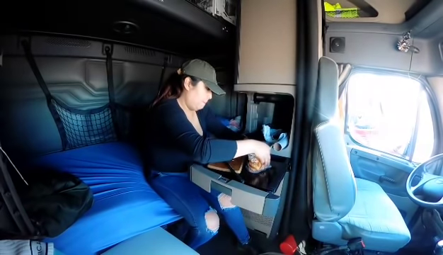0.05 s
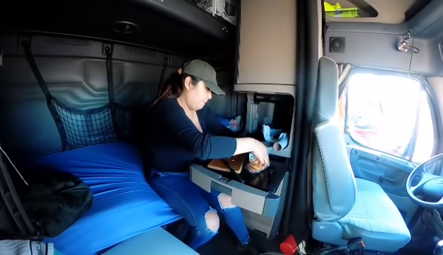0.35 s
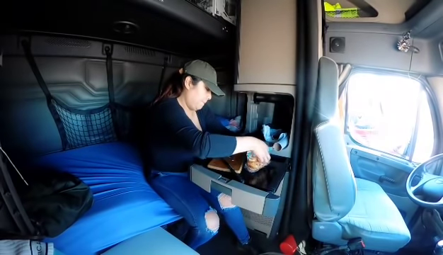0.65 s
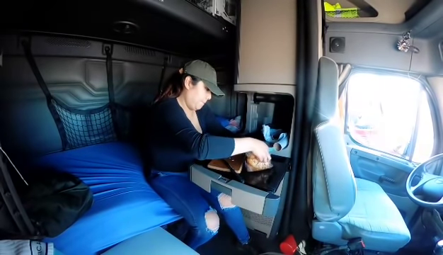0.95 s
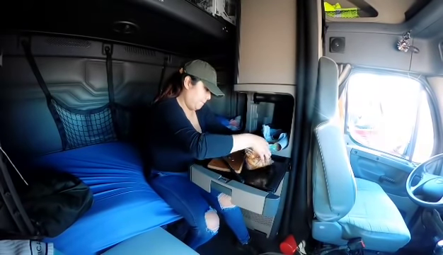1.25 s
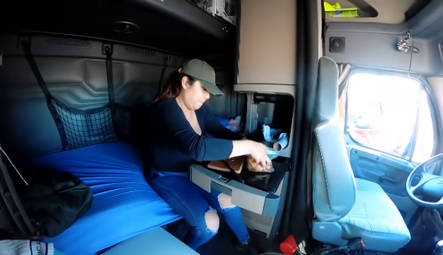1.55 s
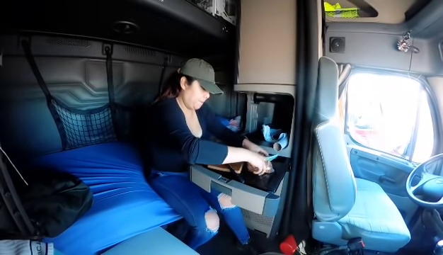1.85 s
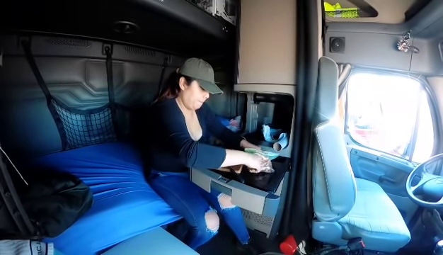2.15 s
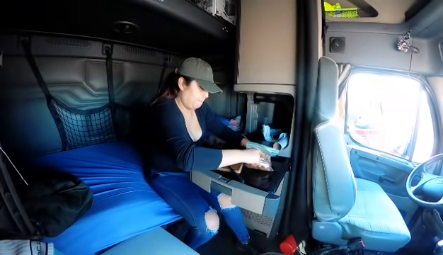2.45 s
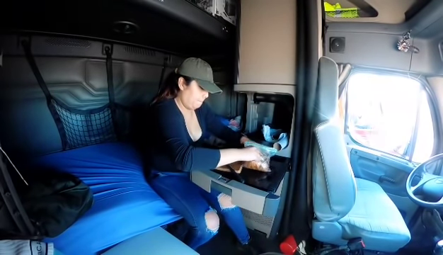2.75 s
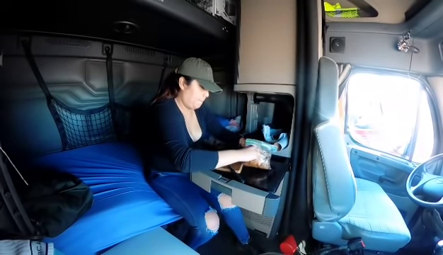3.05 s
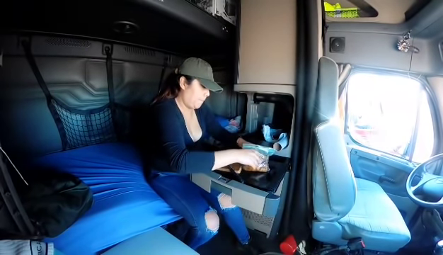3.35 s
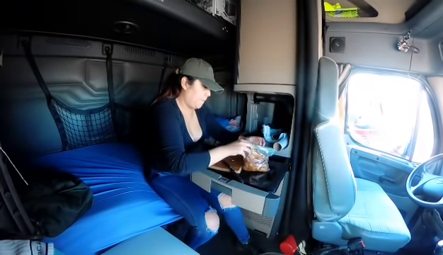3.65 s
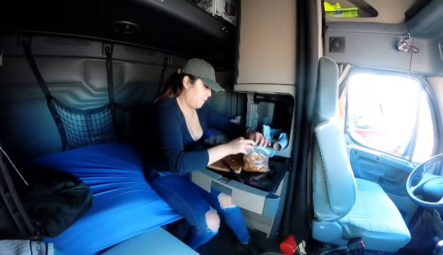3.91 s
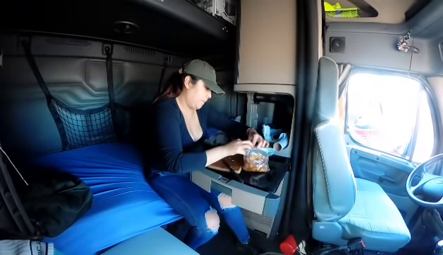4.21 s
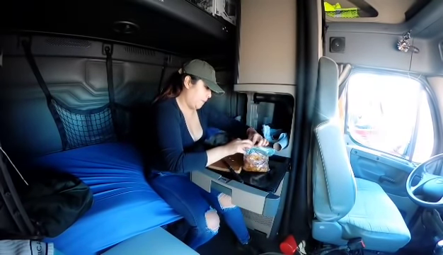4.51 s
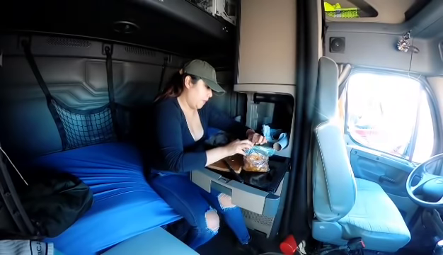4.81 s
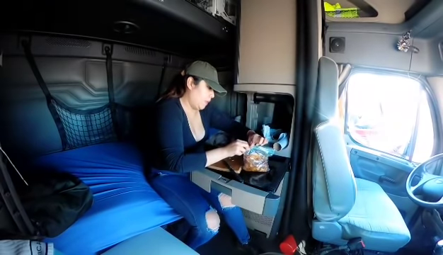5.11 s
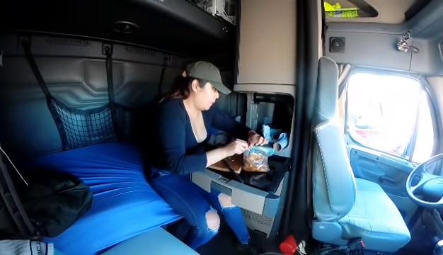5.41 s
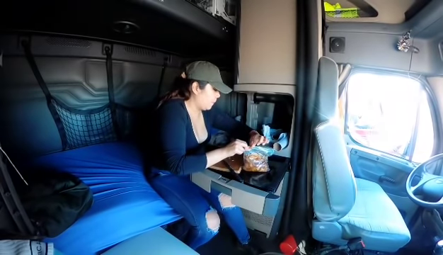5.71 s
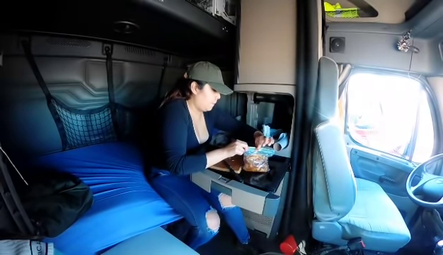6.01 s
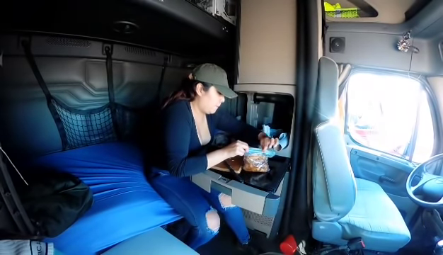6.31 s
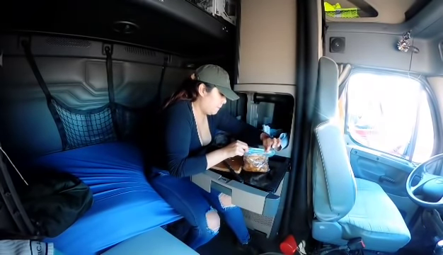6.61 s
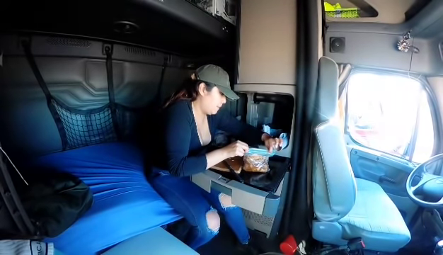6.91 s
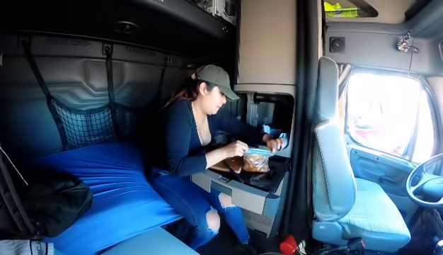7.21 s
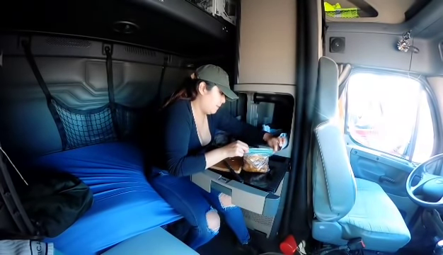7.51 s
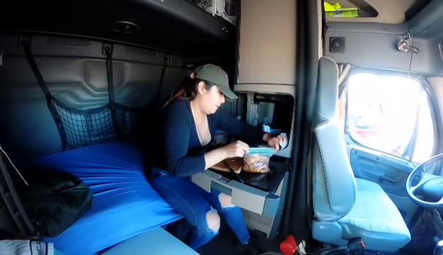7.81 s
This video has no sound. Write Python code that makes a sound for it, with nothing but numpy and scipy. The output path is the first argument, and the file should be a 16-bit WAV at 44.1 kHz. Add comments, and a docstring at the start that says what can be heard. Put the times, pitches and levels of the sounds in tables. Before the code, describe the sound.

A large diesel truck engine idles steadily, heard from inside its sleeper cab as a deep rumble and hum with a muffled knock. Close by, a plastic zip bag is squeezed and rummaged through, crinkling and snapping, with a few light taps of food pieces. About halfway through, the handling settles into occasional ticks and crackles while the engine idles on unchanged.

```python
"""From the start, a six-cylinder diesel truck engine idles at 650 rpm, heard inside its sleeper cab.
Its firings make the cab boom, with rumble, air noise, hum, muffled knock and ringing injectors.
Right away, someone squeezes and rummages in a plastic zip bag: creases in the film crinkle and snap,
and pieces of food tap together. After four seconds the hands come to rest and just hold the bag,
so it only ticks now and then while the engine idles on."""
import sys
import numpy as np
from scipy import signal
from scipy.fft import rfft, irfft, next_fast_len
from scipy.io import wavfile
from scipy.ndimage import uniform_filter1d

SR = 44100
rng = np.random.default_rng(int(sys.argv[2]) if len(sys.argv) > 2 else 0)


def transcribe(u):
    """Save the signal u as a 16-bit wav file named by the first command-line argument.

    u: samples, shape (n,) or (channels, n), limited to [-1, 1]; the rate is SR.
    q: integer samples, one column per channel.
    """
    v = np.clip(np.atleast_2d(u).T, -1, 1)
    q = np.round(v * 32767).astype(np.int16)
    wavfile.write(sys.argv[1], SR, q)


N = 346386
TIME = np.arange(N) / SR
CYCLE_HZ, CYLINDERS = 5.41496, 6  # in one cycle the engine turns twice and each cylinder fires once

# A spectrum table only sets the balance of low and high pitches, not the overall loudness.
# exhaust and fan rumble: pitch_hz, level_db
RUMBLE_SPECTRUM = [(8, -6), (22, 1.5), (48, 3), (90, 2), (135, -1), (180, -5.5), (240, -10), (305, -8),
                   (348, -13), (378, -7.5), (405, -16), (440, -17.5), (520, -25.5), (2500, -85.5)]
# steady air noise: pitch_hz, level_db
AIR_SPECTRUM = [(500, -19.5), (1500, 6.5), (2600, -1.5), (3600, 1.5), (4200, -7.5), (5600, -8), (6200, -15),
                (7900, -18), (8300, -25.5), (10500, -32.5), (11500, -43)]
# tones of the booming cab: multiple_of_cycle_rate, level_db
BOOM_TONES = [(2, -49), (3, -44), (5, -44), (6, -25), (8, -46), (9, -33), (10, -50), (12, -24), (13, -44),
              (15, -44), (16, -51), (17, -47), (18, -38), (21, -44), (24, -47), (25, -46), (26, -50),
              (27, -39), (28, -51), (29, -51), (36, -42), (42, -53), (48, -53), (54, -56), (144, -65),
              (148, -62), (160, -62)]
# tones of the belt-driven parts: pitch_hz, level_db
BELT_TONES = [(14.7, -35.5), (80.6, -47.5), (89.5, -40), (110.2, -43), (142, -54), (209.5, -55.5),
              (231.5, -46), (264.5, -59)]
# burning fuel, heard through the wall behind the engine: pitch_hz, level_db
KNOCK_SPECTRUM = [(200, -21), (420, 4.5), (530, -4), (600, 1.5), (720, 0), (810, 1), (920, -4.5),
                  (990, 0.5), (1030, -6), (1130, -2.5), (1280, -10.5), (1900, -16), (2600, -19.5),
                  (8000, -67.5)]
# metal that each fuel injection rings: pitch_hz, width_hz, level_db
INJECTOR_RINGS = [(1426, 16, -67.5), (1735, 42, -64.5), (1796, 61, -63.5), (1828, 380, -66.5),
                  (3580, 1500, -66.5)]
# squeezes of the bag: hold_start_s, hold_length_s, relative_level_db
BAG_SQUEEZES = [(0.009, .08, -54), (0.418, 0.17, -47.3), (0.822, 0.1, -51.5), (1.282, .22, -54.5),
                (1.628, 0.072, -50.5), (1.929, 0.028, -51.5), (2.059, 0.046, -48), (2.295, 0.032, -55.5),
                (2.515, 0.042, -55), (2.857, 0.028, -54.5), (2.934, 0.068, -47.5), (3.135, 0.054, -52),
                (3.347, 0.026, -49.5), (3.646, 0.017, -66), (3.894, .04, -54.5)]
# tone colour of the bag's crinkles and snaps, treble stepped down by the recorder: pitch_hz, level_db
CRINKLE_SPECTRUM = [(500, -9.5), (1200, -5.5), (2100, -2.5), (3000, -5.5), (4400, 0), (5600, -2.5),
                    (6300, -6), (7700, -8), (8400, -16), (10200, -15.5), (11800, -27.5)]
# large creases snapping over: start_s, relative_level_db, relative_brightness_db
CREASE_SNAPS = [(0.0407, -30, 1), (0.213, -32.5, -14.5), (0.4216, -25.5, -19), (0.4563, -30, -26),
                (0.4944, -25.5, -30), (0.612, -23.5, -21), (0.696, -29, -11), (0.7614, -32, -20),
                (0.8796, -26.5, -22), (0.9665, -31.5, -13), (1.1144, -41, -1), (1.271, -32.5, -1),
                (1.655, -29, -25), (1.807, -36.5, -6), (1.8566, -27.5, -13), (1.919, -29, -7),
                (1.9974, -30.5, -18), (2.038, -31, -14.5), (2.0914, -30, -22), (2.1307, -26.5, -30),
                (2.1746, -29, -32), (2.1948, -30, -28), (2.297, -31, -30), (2.4132, -35.5, -27),
                (2.714, -30.5, -25), (2.9047, -26.5, -2), (3.107, -33, -27), (3.211, -33, -25),
                (3.3228, -27, -8), (3.3393, -29, -18), (3.386, -28.5, -13), (3.637, -31, -17),
                (3.887, -29.5, -9), (3.9724, -30, -10), (4.354, -37.5, -8), (4.3994, -39, -5),
                (6.2253, -40, -23), (6.352, -41, -9), (6.59, -40, -10), (6.6066, -23, -12),
                (6.853, -32.5, -16), (6.955, -29.5, -22), (7.568, -35, -21), (7.6909, -38.5, -12)]
# pieces of food knocking together: start_s, relative_level_db, pitch_hz
FOOD_TAPS = [(0.425, -29, 2600), (0.557, -33, 2480), (2.327, -25.5, 2130), (2.714, -30.5, 2400),
             (2.86, -30.5, 2300), (2.905, -30, 2400), (2.954, -31, 2320), (3.974, -29, 1680),
             (6.690, -28.5, 2170), (6.956, -32, 2200)]


def from_db(db):
    """Turns decibels into a gain, the number to multiply a sound by."""
    return 10 ** (np.asarray(db) / 20)


def unit(x):
    """Scales a signal to an average (rms) level of 1."""
    return x / np.sqrt(np.mean(x ** 2) + 1e-20)


def gain_at(spectrum, hz):
    """Looks up a spectrum table's gain at any pitch."""
    pitch_hz, level_db = np.transpose(spectrum)
    return from_db(np.interp(np.log(hz + 1), np.log(pitch_hz + 1), level_db))


def colour_noise(x, spectrum):
    """Gives a steady sound the tone colour of a table, at level 1."""
    size = next_fast_len(N)
    gains = gain_at(spectrum, np.fft.rfftfreq(size, 1 / SR))
    return unit(irfft(rfft(x, size) * gains, size)[..., :N])


def colour_clicks(x, spectrum, size=1024):
    """Gives clicks the tone colour of a table, with nothing sounding before each click."""
    log_gain = np.log(gain_at(spectrum, abs(np.fft.fftfreq(size, 1 / SR))))
    response = np.fft.ifft(np.exp(np.conj(signal.hilbert(log_gain)))).real[:size // 2]
    return signal.oaconvolve(x, response[None] / np.linalg.norm(response), axes=1)[:, :N]


def drift(rate_hz):
    """Smooth random wandering at level 1."""
    hz = np.fft.rfftfreq(N, 1 / SR)
    return unit(irfft(rfft(rng.standard_normal(N)) * np.exp(-(hz / rate_hz) ** 2), N))


def stereo_noise(side_db):
    """Hiss; side_db sets how much left and right differ."""
    mid, side = rng.standard_normal((2, N))
    return mid + from_db(side_db) * np.array([side, -side])


def add(mix, start_s, sound):
    """Mixes a sound in at the given time."""
    part = mix[..., max(round(start_s * SR), 0):][..., :sound.shape[-1]]
    part += sound[..., :part.shape[-1]]


def pop(hz, ring_cycles, size=400):
    """A click that rings briefly at one pitch."""
    turns = hz * np.arange(size) / SR
    wave = np.sin(2 * np.pi * turns) * np.exp(-turns / ring_cycles)
    return wave / abs(wave).max()


def rumble(level_db=-31.5):
    """Swirling gas from the exhaust and fan rumbles through the cab walls."""
    return from_db(level_db) * colour_noise(stereo_noise(side_db=-37.5), RUMBLE_SPECTRUM)


def air(level_db=-55.5):
    """Air hisses softly and steadily."""
    return from_db(level_db) * colour_noise(stereo_noise(side_db=-6), AIR_SPECTRUM)


def boom(cycles, firing_waver=0.033, uneven_waver=0.11):
    """The firings boom in firm tones; unequal cylinders add tones in between that waver more."""
    out = np.zeros(N)
    for multiple, db in BOOM_TONES:
        uneven = multiple % CYLINDERS > 0
        turns = multiple * cycles + uneven * rng.random()
        waver = uneven_waver if uneven else firing_waver
        sway = np.interp(TIME, np.linspace(0, TIME[-1], num=24), rng.standard_normal(24))
        out -= from_db(db) * (1 + waver * sway) * np.sin(2 * np.pi * turns)
    return np.sqrt(2) * out


def belt_hum(slip_hz=.35):
    """Belt-driven parts hum out of step with the firings, each slipping a little in speed."""
    out = np.zeros(N)
    for hz, db in BELT_TONES:
        turns = np.cumsum(hz + slip_hz * drift(rate_hz=1.96)) / SR + rng.random()
        out += from_db(db) * np.sin(2 * np.pi * turns)
    return np.sqrt(2) * out


def firing_pulse(cycles, fade_s):
    """Jumps to 1 each time a cylinder fires, then fades."""
    age_s = (cycles * CYLINDERS % 1) / (CYCLE_HZ * CYLINDERS)
    return np.exp(-age_s / fade_s)


def knock(cycles, level_db=-45.5, repeat_share=.33, steady=2.4):
    """Burning fuel knocks: each cylinder repeats its own pattern, and the rest of each burn is new."""
    size = round(SR / CYCLE_HZ)
    pattern = rng.standard_normal(size)[(cycles % 1 * size).astype(int) % size]
    burn = np.sqrt(repeat_share) * pattern + np.sqrt(1 - repeat_share) * stereo_noise(side_db=-22)
    throb = steady + firing_pulse(cycles, fade_s=.014)
    return from_db(level_db) * colour_noise(burn * throb, KNOCK_SPECTRUM)


def injectors(cycles, steady=0.2):
    """Every squirt of fuel rings the metal again, so the ring throbs with the firings."""
    throb = uniform_filter1d(steady + firing_pulse(cycles, fade_s=.013), size=130)
    out = np.zeros(N)
    for hz, width_hz, db in INJECTOR_RINGS:
        pole = np.exp((2j * np.pi * hz - np.pi * width_hz) / SR)  # makes a filter that rings at hz
        ring = signal.lfilter([1], np.poly([pole, pole]), rng.standard_normal(N)).real
        out += from_db(db) * unit(ring * throb)
    return out


def handling(grip_db_per_s=197, relax_db_per_s=187, stir_db=-62, stir_end_s=3.6, rest_db_per_s=29.5):
    """How hard the hands work the bag: they grip, hold and let go, stirring it faintly until they rest."""
    effort_db = stir_db - rest_db_per_s * np.maximum(TIME - stir_end_s, 0)
    for start_s, hold_s, db in BAG_SQUEEZES:
        before_s = np.maximum(start_s - TIME, 0)
        after_s = np.maximum(TIME - start_s - hold_s, 0)
        effort_db = np.maximum(effort_db, db - grip_db_per_s * before_s - relax_db_per_s * after_s)
    return from_db(effort_db)


def cab_echo(x, fade_s, wet_db, side_db, pan_db=-1.7, size=6000):
    """Close, padded walls add many short echoes; the bag lies a little to the right."""
    t = np.arange(size) / SR
    echoes = rng.standard_normal((2, size)) * (rng.random((2, size)) < .15) * (t > .002)
    mid, side = echoes * from_db(-60 * t / fade_s)
    side = np.diff(side, prepend=0)  # left and right differ most in the treble
    response = mid + from_db(side_db) * np.array([side, -side])
    response *= from_db(wet_db) / np.linalg.norm(mid)
    response[:, 0] = 1  # the direct sound
    return from_db([[pan_db / 2], [-pan_db / 2]]) * signal.oaconvolve(x[None], response, axes=1)[:, :N]


def crinkle(boost_db=1, top_creases_per_s=750):
    """Countless small creases flip in clumps: more and louder the harder the bag is squeezed."""
    effort = handling()
    clumps = from_db(2 * drift(rate_hz=110))
    creases_per_s = top_creases_per_s * np.sqrt(effort / effort.max())
    strengths = from_db(4 * np.minimum(rng.exponential(1, N), 2.8)) * rng.choice([-1, 1], N)
    flips = rng.random(N) < creases_per_s / SR
    clicks = clumps * strengths * flips / np.sqrt(creases_per_s)
    pitches_hz = np.geomspace(2000, 8000, num=12)
    pitch_choice = rng.integers(0, len(pitches_hz), N)
    film = np.zeros(N)
    for k, hz in enumerate(pitches_hz):
        film += signal.oaconvolve(clicks * (pitch_choice == k), np.sqrt(hz) * pop(hz, ring_cycles=.8))[:N]
    in_cab = cab_echo(film * effort, fade_s=0.047, wet_db=1, side_db=-6)
    level = from_db(boost_db) * np.sqrt(np.mean(effort ** 2))
    return level * unit(colour_clicks(in_cab, CRINKLE_SPECTRUM))


def snaps(boost_db=3, edge_db=7, flip_s=0.00078, settle_s=0.015, size=2200):
    """A large crease buckles in a millisecond or two; small ones follow as the film settles."""
    t = np.arange(size) / SR
    buckle = (t / flip_s) ** 2 * np.exp(-t / flip_s)
    wide_ring = pop(hz=4300, ring_cycles=.55)
    tight_ring = pop(hz=7300, ring_cycles=1.6)  # tight folds ring higher than wide ones
    out = np.zeros(N)
    for start_s, db, bright_db in CREASE_SNAPS:
        flurry = .7 * np.exp(-t / settle_s) * (rng.random(size) < .035) * (t > 2 * flip_s)
        wide, tight = (buckle + flurry) * rng.choice([-1, 1], (2, size))
        body = unit(np.convolve(wide, wide_ring))
        edge = unit(np.convolve(tight, tight_ring))
        crack = body + from_db(bright_db + edge_db) * edge
        add(out, start_s, from_db(db) * crack / np.linalg.norm(crack))
    in_cab = cab_echo(out, fade_s=0.14, wet_db=-3, side_db=-1)
    return from_db(boost_db) * colour_clicks(in_cab, CRINKLE_SPECTRUM)


def taps(band_hz=(1450, 3800)):
    """Dry pieces of food knock together, duller than the film."""
    out = np.zeros(N)
    for start_s, db, hz in FOOD_TAPS:
        add(out, start_s, from_db(db) * pop(hz, ring_cycles=1))
    muffle = signal.butter(3, band_hz, btype="band", fs=SR, output="sos")
    return cab_echo(signal.sosfilt(muffle, out), fade_s=0.026, wet_db=-6, side_db=-2.5)


def scene(first_firing_s=.0268):
    """The engine idles at an almost even speed while the bag is handled."""
    speed_hz = CYCLE_HZ * (1 + .0008 * drift(rate_hz=3))
    cycles = np.cumsum(speed_hz) / SR - first_firing_s * CYCLE_HZ  # engine cycles so far
    background = rumble() + air()
    engine = boom(cycles) + belt_hum() + knock(cycles) + injectors(cycles)
    bag = crinkle() + snaps() + taps()
    return background + engine + bag


def record(dry, leak_hz=2.4, top_hz=11600, size=255):
    """The left microphone leaks a little deep bass, shifting its phase; the highest treble is cut."""
    left = signal.lfilter([1, -1], [1, -np.exp(-2 * np.pi * leak_hz / SR)], dry[0])
    soft_ends = signal.windows.tukey(N, size / N)
    low_pass = signal.firwin(2 * size + 1, top_hz, window=("kaiser", 9), fs=SR)
    return signal.oaconvolve(np.array([left, dry[1]]) * soft_ends, low_pass[None], "same", axes=1)


dry = scene()
out = record(dry)
transcribe(out)
```